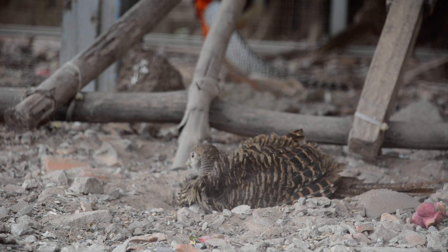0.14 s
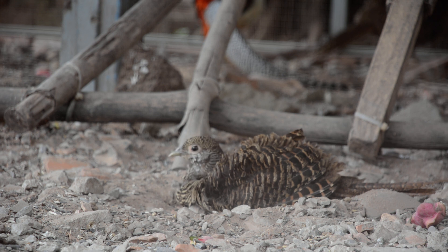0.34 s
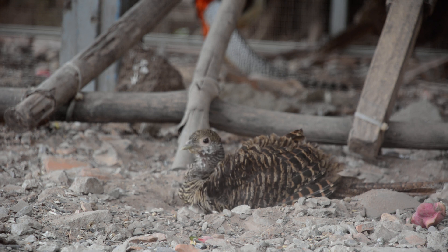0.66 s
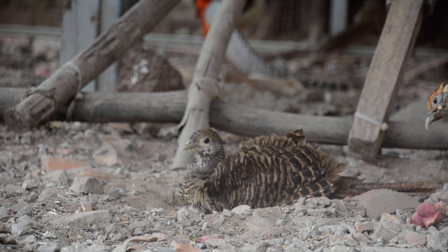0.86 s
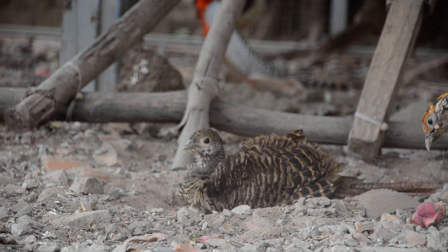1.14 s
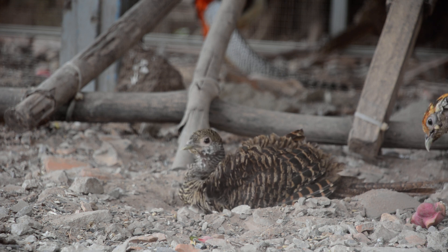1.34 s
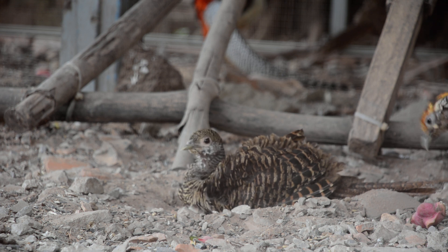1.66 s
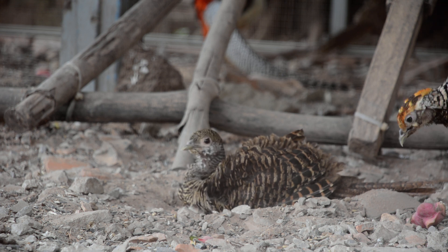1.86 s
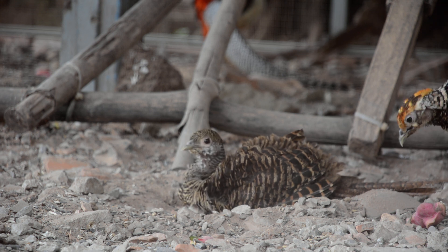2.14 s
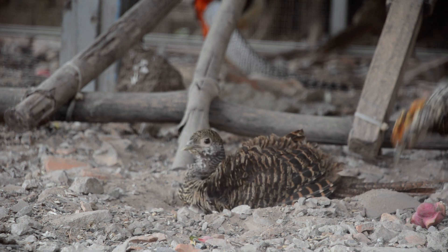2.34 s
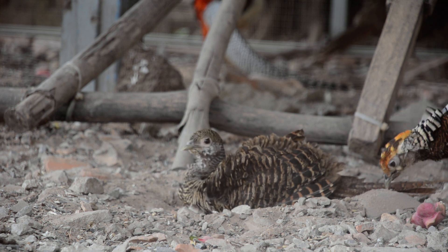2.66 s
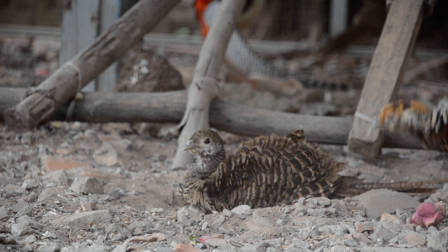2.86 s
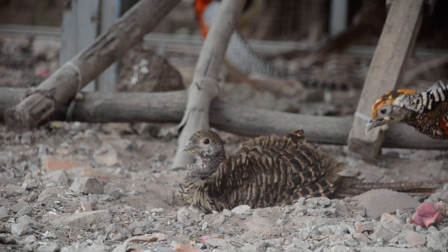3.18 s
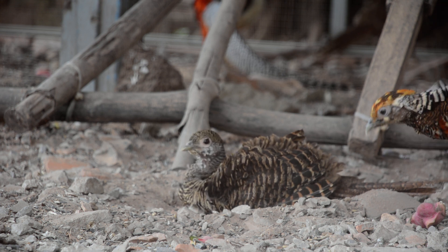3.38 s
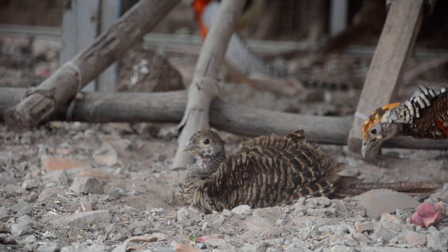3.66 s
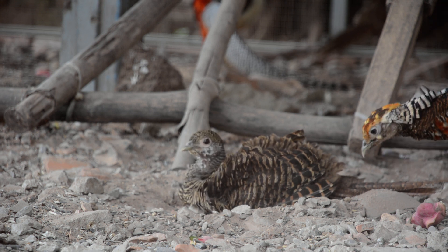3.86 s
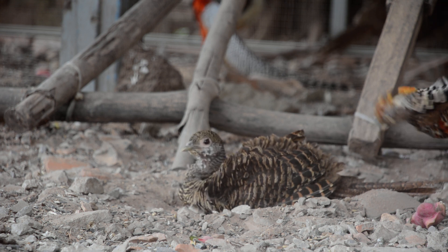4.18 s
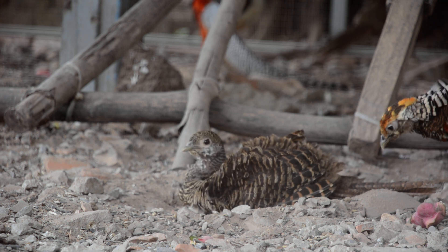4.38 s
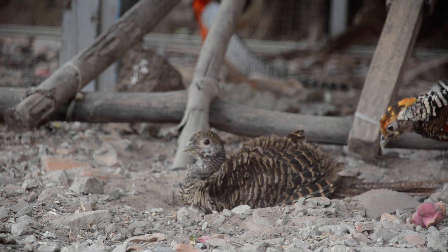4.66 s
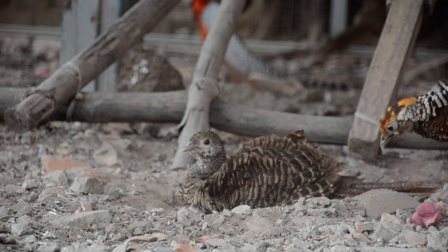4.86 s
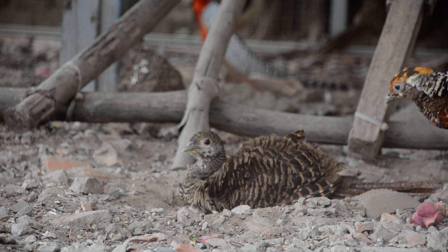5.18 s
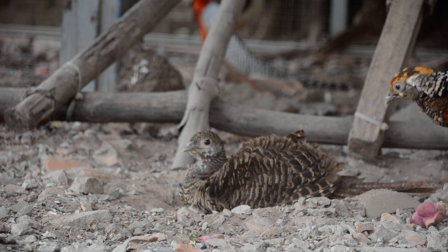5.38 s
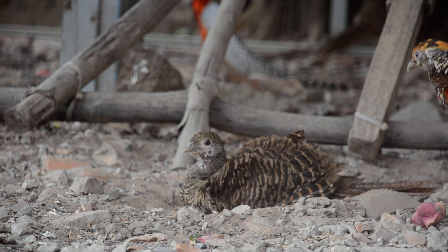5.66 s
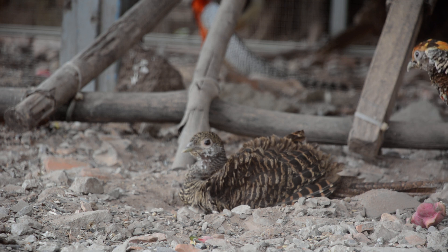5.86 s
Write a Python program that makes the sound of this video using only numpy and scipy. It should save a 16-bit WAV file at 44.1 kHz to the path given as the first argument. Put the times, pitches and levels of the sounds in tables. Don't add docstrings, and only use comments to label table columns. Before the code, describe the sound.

Birds call in a reverberant, hard-walled aviary, captured in stereo with a low traffic hum and faint motor drone. From 0.1 s a loud bird gives harsh, buzzy squawks, strongest and longest around 0.7-1.4 s; a shriller neighbour shrieks at 0.5 and sharply at 1.5 s, with a rough screech at 1.6. Thin peeps and a hoarse, raspy flock fill the gaps. Squawks resume at 1.9-2.4 s, then fade. Near 2.8 s comes a lull, then a quick arched chirp at 3.0. A bright, loud screech cuts through at 3.6-4.0 s. A croak at 4.4 leads to a strong clear pipe at 4.6, a throbbing whistle at 4.9, and a wavering, interrupted whistle from 5.2 to the end with short pips. Gravel clicks at 4.2 and most sharply at 5.6; distant clucks and coos are barely audible early.

```python
import sys
import numpy as np
from scipy import signal
from scipy.fft import rfft, irfft, next_fast_len
from scipy.io import wavfile
from scipy.ndimage import map_coordinates

SR = 44100
rng = np.random.default_rng(int(sys.argv[2]) if len(sys.argv) > 2 else 0)


def store_wav(level_fs):
    pcm = np.round(np.clip(np.atleast_2d(level_fs), -1, 1) * 32767)
    wavfile.write(sys.argv[1], SR, pcm.T.astype(np.int16))


def boost(x):
    u = np.asarray(x, float) / 20
    return 10 ** u


N = 265482
TIME_S = np.arange(N) / SR
ROLL_HZ, ROLL_DB = 75, 7


def rms_one(x):
    return x / np.sqrt(np.mean(x ** 2) + 1e-20)


def at_hz(points, hz):
    where, value = np.transpose(points)
    return np.interp(np.log(np.maximum(hz, 1)), np.log(where), value)


def shaped(x, gain_at):
    size = next_fast_len(len(x))
    hz = np.arange(size // 2 + 1) * SR / size
    return irfft(rfft(x, size) * gain_at(hz), size)[:len(x)]


def band(x, low_hz, high_hz):
    return signal.sosfilt(signal.butter(2, [low_hz, high_hz], "band", fs=SR, output="sos"), x)


def drift(rate_hz):
    r = np.exp(-2 * np.pi * rate_hz / SR)
    noise = rng.standard_normal(N + 4000)
    return rms_one(signal.lfilter([1], [1, -2 * r, r * r], noise)[4000:])


def tremor(rate_hz):
    low_pass = signal.butter(5, rate_hz, fs=SR, output="sos")
    return rms_one(signal.sosfilt(low_pass, rng.standard_normal(SR + 4000))[4000:])


def bumps(rows, x, power=2):
    return sum(db * np.exp(-((x - centre) / half) ** power) for centre, half, db in rows)


def swells(peak_s, swell_s, db):
    t = np.arange(0, N + 64, 64) / SR
    age = (t - peak_s[:, None]) / swell_s[:, None]
    each = boost(db[:, None] - 10 * np.where(age < 0, -age, age / 1.06) ** 1.4)
    return np.interp(TIME_S, t, np.sqrt(np.sum(each ** 2, axis=0)))


def phrase(row, shape):
    start, length, open_hz, settled_hz, db = row
    attack, rise_db, sag_db, release, fade_db, gliding = shape
    age = np.linspace(0, length, num=24)
    swell = rise_db * np.clip(1 - age / attack, 0, 1)
    sag = sag_db * np.maximum(age - attack, 0)
    fade = fade_db * np.clip(1 - (length - age) / release, 0, 1)
    pitch_hz = np.interp(age, [0, gliding * length], [open_hz, settled_hz])
    return np.transpose([start + age, pitch_hz, db - swell - sag - fade])


def call(rows, voice, rough):
    s, pitch_hz, level_db = np.transpose(rows)
    first, last = round(s[0] * SR), min(round(s[-1] * SR), N)
    t = np.arange(first, last) / SR
    wander = 1 + rough * (.012 * tremor(50) + .042 * tremor(200))[:len(t)]
    phase = 2 * np.pi * np.cumsum(np.interp(t, s, pitch_hz) * wander) / SR
    top_db = max(db for k, db in voice)
    tone = sum(boost(db - top_db) * np.sin(k * phase + k * k) for k, db in voice)
    flutter = boost(4.5 * min(rough, .6) * tremor(130)[:len(t)])
    edges = np.clip(np.minimum(t - t[0], t[-1] - t) / .01, 0, 1)
    out = np.zeros(N)
    out[first:last] = np.sqrt(2) * tone * flutter * edges * boost(np.interp(t, s, level_db))
    return out


def bird(calls, shape, voices, roughs, trim_db):
    roughs = np.resize(roughs, len(calls))
    return boost(trim_db) * sum(call(phrase(c, shape), v, r) for c, v, r in zip(calls, voices, roughs))


# start in seconds, length in seconds, opening pitch in Hz,
# settled pitch in Hz, level in dB of the strongest partial. Other birds' calls use the same columns.
SQUAWK_CALLS = [
    (0, 0.11, 2110, 2027, -48.5),
    (0.131, 0.16, 2152, 2023, -37),
    (0.247, 0.135, 1960, 1956, -33),
    (0.72, 0.25, 2166, 2120, -31.5),
    (0.901, 0.14, 2085, 2041, -29.5),
    (1.028, 0.36, 2026, 2027, -29),
    (1.854, .23, 2086, 2000, -36),
    (2.084, 0.18, 2122, 2062, -33),
    (2.269, 0.17, 2004, 1904, -39.5),
]
SQUAWK_ROUGHNESS = [.4, .45, .35, .55, .58, .56, .55, .55, .5]
# multiple of the pitch, level in dB. All voices use these columns.
SQUAWK_PARTIALS = [(1, -4.5), (2, 1.5), (3, -15.5), (3.5, -20.5), (4, -11.5), (5, -28), (6, -41), (7, -51)]
# attack in seconds, rise in dB, sag in dB per second, release in seconds, fade in dB,
# share of the call spent gliding. All shapes use this order.
SQUAWK_CONTOUR = (0.077, 1.8, 24, 0.072, 4.6, .6)


def squawker():
    voices = [SQUAWK_PARTIALS] * len(SQUAWK_CALLS)
    return bird(SQUAWK_CALLS, SQUAWK_CONTOUR, voices, SQUAWK_ROUGHNESS, trim_db=5.0)


SHRIEK_CALLS = [
    (.53, 0.22, 2024, 2040, -34),
    (1.5, 0.149, 2066, 2089, -30),
    (2.39, 0.177, 1975, 2038, -36),
    (2.94, 0.22, 2200, 1983, -42),
]
# multiple of the pitch, level in dB.
SHRIEK_PARTIALS = [(1, -5), (2, 2), (3, -9), (3.5, -15), (4, -7), (5, -19), (6, -37), (7, -51)]
SHRIEK_ROUGHNESS = [.6, .7, .6, .7]
SHRIEK_CONTOUR = (0.093, 4.5, 28, 0.11, 7, .5)
SHRIEK_ROLL = [.6, .3, .7, 1]


def shrieker():
    dying = sum(share * np.exp(-np.abs(TIME_S - c[0]) / .08) for c, share in zip(SHRIEK_CALLS, SHRIEK_ROLL))
    voices = [SHRIEK_PARTIALS] * len(SHRIEK_CALLS)
    voice = bird(SHRIEK_CALLS, SHRIEK_CONTOUR, voices, SHRIEK_ROUGHNESS, trim_db=2.0)
    roll = dying * np.sin(2 * np.pi * ROLL_HZ * TIME_S)
    pitch_bend = 0.035
    bent_s = TIME_S + roll * pitch_bend / (2 * np.pi * ROLL_HZ)
    return boost(ROLL_DB * roll) * map_coordinates(voice, [bent_s * SR], order=3)


SCREECH_CALLS = [
    (1.63, 0.3, 1102, 1097, -26.5),
    (3.565, 0.14, 1083, 1085, -31.5),
    (3.635, .35, 1141, 1100, -23.5),
]
# multiple of the pitch, level in dB.
SCREECH_PARTIALS = [
    [(2, -16), (4, 9.5), (5, 1.5), (6, -23), (8, -2), (10, -19)],
    [(2, -3), (4, -6), (5, 4), (10, -8.5)],
    [(1, -15), (2, -21), (3, -4), (4, 11.5), (6, -19), (8, 2.5)],
]
SCREECH_ROUGHNESS = [.85, .7, .32]
SCREECH_CONTOUR = (0.094, 5.4, 85, 0.12, 10, .7)


def screecher():
    return bird(SCREECH_CALLS, SCREECH_CONTOUR, SCREECH_PARTIALS, SCREECH_ROUGHNESS, trim_db=-5.0)


CROAK_CALLS = [
    (3.32, 0.2, 1425, 1500, -47),
    (4.06, 0.12, 1491, 1543, -43.5),
    (4.23, 0.077, 1780, 1730, -42),
    (4.42, 0.145, 1918, 1832, -29.5),
    (5.11, 0.14, 1807, 1880, -47.5),
]
# multiple of the pitch, level in dB.
CROAK_PARTIALS = [
    [(1, -20), (2, -7.5), (2.8, -7.5)],
    [(1, -1), (2, 11), (3, -4)],
    [(1.33, 8), (2, -3), (3.33, -10)],
    [(1, -8), (1.5, -11), (2, 6), (3.5, -17), (4, -8), (4.5, -11), (5, -15)],
    [(2, 0.5), (4, -2)],
]
CROAK_ROUGHNESS = [1.2, 1.2, .2, .7, 1.0]
CROAK_CONTOUR = (0.058, 2.6, 20, 0.065, 20, 0.614)


def croaker():
    return bird(CROAK_CALLS, CROAK_CONTOUR, CROAK_PARTIALS, CROAK_ROUGHNESS, trim_db=2.0)


PIPING_CALLS = [
    (4.61, 0.21, 1577, 1529, -27.5),
    (4.91, 0.16, 1576, 1582, -39.5),
    (5.37, 0.088, 1584, 1550, -40),
    (5.48, 0.078, 1562, 1525, -39.5),
    (5.675, 0.12, 1576, 1582, -40),
    (5.83, 0.13, 1583, 1550, -37.5),
    (5.96, 0.066, 1574, 1563, -42),
]
# multiple of the pitch, level in dB.
PIPING_PARTIALS = [
    [(2, 3), (3, -19), (4, -15.5)],
    [(1, -13), (2, 1), (3, 0.5), (5, -12)],
    [(2, 3.5), (3, -10)],
    [(2, -3), (3, -7)],
    [(2, 1), (3, -1.5), (5, -19)],
    [(2, 2), (3, -2), (5, -8)],
    [(2, 0), (3, -5)],
]
PIPING_CONTOUR = (0.011, 1.5, 95, 0.043, 13, 0.412)


def piping():
    return bird(PIPING_CALLS, PIPING_CONTOUR, PIPING_PARTIALS, .16, trim_db=-4.5)


TRILL_CALLS = [
    (4.855, 0.221, 2800, 2749, -37.5),
]
# multiple of the pitch, level in dB.
TRILL_PARTIALS = [
    [(1, 15), (2, -8.5), (3, -36)],
]
TRILL_CONTOUR = (0.044, 7.5, 12, 0.14, 7.2, 0.676)
# centre in seconds, half length in seconds, gain in dB.
TRILL_THROBS = [(4.885, 0.013, 2), (4.902, .004, -8), (4.914, .004, 11), (4.92, 0.0023, -19),
                (4.929, .007, 10.5), (4.949, .006, -6.5), (4.962, 0.0046, 6), (4.973, 0.0059, -15),
                (4.997, .012, 6.5), (5.022, .006, 0), (5.04, 0.012, 8)]


def trilled_whistle():
    return boost(bumps(TRILL_THROBS, TIME_S)) * bird(TRILL_CALLS, TRILL_CONTOUR, TRILL_PARTIALS, .1, trim_db=2.0)


# time in seconds, pitch in Hz, level in dB.
LONG_PATH = [(5.15, 1205, -39.5), (5.2, 1258, -50), (5.225, 1394, -44), (5.33, 1423, -34.5),
             (5.42, 1451, -33), (5.49, 1451, -33), (5.62, 1463, -37), (5.87, 1462, -35.5),
             (6.02, 1435, -43)]
# multiple of the pitch, level in dB.
LONG_PARTIALS = [(1, -2), (2, -19.5)]
# centre in seconds, half length in seconds, depth in dB.
BREATH_CATCHES = [(5.262, .01, 6), (5.358, .012, 18), (5.39, .022, 8), (5.462, .007, 5), (5.533, .016, 12),
                  (5.575, .025, 4), (5.604, .008, 18), (5.621, .009, -3), (5.69, .015, 5), (5.785, .01, 10),
                  (5.848, .011, 14), (5.888, .009, 13), (5.94, .015, 8), (5.985, .015, 8)]


def long_whistle():
    beads = boost(drift(45))
    catches = boost(-bumps(BREATH_CATCHES, TIME_S, power=4))
    return beads * catches * call(LONG_PATH, LONG_PARTIALS, rough=.34)


# time in seconds, pitch in Hz, level in dB.
CHIRP_PATH = [
    (2.87, 1670, -69),
    (2.94, 1920, -51.5),
    (2.98, 2080, -54),
    (3.008, 2020, -37),
    (3.03, 1800, -43),
]
# multiple of the pitch, level in dB.
CHIRP_PARTIALS = [(1, -6), (2, 3.5), (3, 1), (4, 5), (5, -2)]


def chirp():
    rising = TIME_S < CHIRP_PATH[2][0]
    roll = boost(ROLL_DB * np.sin(2 * np.pi * ROLL_HZ * TIME_S) * rising)
    return roll * call(CHIRP_PATH, CHIRP_PARTIALS, rough=0.32)


PEEP_CALLS = [
    (.31, .09, 2890, 2860, -45),
    (.63, .09, 3043, 3020, -47),
    (1.05, .33, 3030, 3040, -43),
    (1.62, .18, 3050, 3180, -48),
    (1.87, .13, 3150, 3000, -47),
    (2.16, .14, 3140, 3090, -42),
]
PEEP_ROUGHNESS = [.25, .4, .6, .55, .7, .45]
PEEP_CONTOUR = (0.014, 2.1, 42, 0.028, 21, 0.583)


def peeps():
    return bird(PEEP_CALLS, PEEP_CONTOUR, [[(1, 0)]] * len(PEEP_CALLS), PEEP_ROUGHNESS, trim_db=4.5)


# start in
# seconds, end in seconds, pitch in Hz, level in dB, roughness 0 upward.
LONE_NOTES = [(.76, .94, 2160, -32.5, 0.39), (1.53, 1.69, 2080, -33, 0.36), (3.63, 3.93, 3330, -40.5, 0.22),
              (3.82, 3.95, 2700, -46, 0.28), (0.85, 0.94, 5220, -46, 0.24), (1.441, 1.507, 3100, -38, 0.23),
              (1.532, 1.699, 2350, -36, 0.59), (1.365, 1.464, 1361, -49.5, 0.34),
              (3.609, 3.695, 4215, -30.5, 0.25), (3.74, 3.92, 7040, -47, 0.18),
              (3.73, 3.92, 1130, -51.5, 0.37), (4.25, 4.32, 4700, -60, .1),
              (4.289, 4.424, 2894, -42.5, 0.98), (4.504, 4.675, 2777, -40.5, 0.7),
              (4.457, 4.56, 5800, -48, 0.55), (5.221, 5.32, 4800, -54, 0.6), (5.3, 5.36, 2500, -41, 0.72),
              (5.502, 5.55, 2700, -45, 0.64), (5.848, 5.964, 2200, -51, 0.85), (5.9, 5.97, 1220, -44, 0.64),
              (.17, 0.272, 2090, -35, 0.32), (0.33, 0.36, 1950, -36, 0), (0.25, 0.43, 5800, -46, .3),
               (0.092, 0.27, 4300, -41.5, 0.9), (0.79, 1.02, 3650, -39, .8), (1.08, 1.32, 3300, -44, .8),
               (.72, 0.77, 3020, -53, 0.4), (1.465, 1.52, 7500, -38.5, 0.96), (4.83, 4.9, 11450, -63.5, .3),
               (4.9, 5.0, 9450, -61, 0.14), (5.1, 5.22, 3650, -43, .35), (2.96, 3.03, 4350, -40, .5),
               (3.02, 3.1, 3900, -43, .5), (4.81, 4.92, 2330, -41, 0.28), (4.9, 5.04, 2300, -47.5, .35),
               (1.474, 1.488, 3400, -23, 0.62), (1.468, 1.492, 2300, -34.5, 0.71),
               (1.64, 1.8, 5500, -39, .45), (2.41, 2.57, 5950, -42.5, 0.5), (2.89, 2.97, 2750, -50, 0.62),
               (2.9, 2.97, 4200, -58, 0.88), (3.6, 3.76, 5400, -43, 0), (3.62, 3.7, 2170, -44, 0.41),
               (3.79, 3.95, 3400, -50, 0.3), (3.76, 3.87, 7200, -41.5, .55), (4.475, 4.57, 1860, -39, 0.26),
               (4.56, 4.67, 5700, -51, 0.44), (5.57, 5.68, 3100, -54.5, 0.24),
               (5.75, 5.83, 3150, -51, 0.16), (4.92, 5.08, 3150, -48, 0.16), (5.88, 5.94, 4100, -51, 0.7),
               (3.66, 3.85, 4200, -32, 0.16), (3.74, 3.98, 4440, -39.5, .2), (5.5, 5.95, 1560, -46.5, .22),
               (5.22, 5.45, 1400, -52, 0.29), (5.1, 5.18, 2770, -46, 0.16), (.54, 0.73, 6100, -43, 0.2),
               (2.81, 2.84, 930, -46.5, 1.05)]


def lone_notes():
    out = 0
    for a, b, hz, db, rough in LONE_NOTES:
        path = [(a, hz, db - 4), ((2 * a + b) / 3, hz, db), (b, hz, db - 5)]
        out = out + call(path, [(1, 0)], 4 * rough ** 1.5)
    return out


# peak in seconds, swell time in seconds for 10 dB, level in dB, brightness in dB.
OUTBURSTS = [(.08, 0.5, -41, -32), (.17, 0.3, -36, -5), (.5, -1.5, -42.5, -5), (.75, 0.52, -46, 12),
             (.94, 0.04, -36, -8), (1.15, 0.2, -28, -2.5), (1.44, 0.11, -31, -8.5), (1.47, 0, -33, 12),
             (1.63, 0.07, -32.5, 7), (1.89, 0.39, -33.5, 1), (2.31, 0.3, -35.5, -1),
             (2.49, -0.01, -35.5, -8), (2.961, 0.14, -39, -3), (3.04, 0.08, -41, 4), (3.44, 0, -47, 2),
             (3.57, 0.2, -39.5, -5), (3.64, 0.07, -40, 4.5), (3.72, 0.0824, -29.5, 3),
             (3.8, 0.1346, -28.5, -5.5), (4.12, 0.1, -37.5, -24), (4.31, -0.1, -39, -18),
             (4.39, 0.07, -36.5, 0.5), (4.46, 0, -32.5, 4), (4.56, -0.15, -33.5, -0.5),
             (4.71, -0.3, -36.5, -14), (4.95, -4, -49.5, -24), (5.18, 0.11, -29.5, -9),
             (5.5, 0.3, -39, -15), (5.868, 0.08, -30, -7), (6.01, 1.2, -47, -23)]
# frequency in Hz, level in dB per Hz.
RASP_COLOUR = [(530, -50), (900, -8), (1270, -7), (1430, -13.5), (1670, -14), (2070, -3.5), (2600, -7.5),
               (4090, 5), (4950, -6), (6140, -11), (9210, -6.5), (15600, -55)]


def chorus():
    s, swell_s, db, bright_db = np.transpose(OUTBURSTS)
    effort = 0
    for c in SQUAWK_CALLS + SHRIEK_CALLS:
        path = phrase(c, SQUAWK_CONTOUR)
        effort = effort + boost(np.interp(TIME_S, path[:, 0], path[:, 2], left=-120, right=-120))
    throat = swells(s, swell_s, db)
    beak = np.hypot(swells(s, swell_s, db + bright_db), boost(-27) * effort)
    hiss = np.hypot(swells(s, swell_s, db - 9.5 + 0.9 * bright_db), boost(-10) * effort)
    out = 0
    for gain, low_hz, high_hz in ((throat, 1500, 3350), (beak, 4200, 7630), (hiss, 6600, 12600)):
        slaps = rng.standard_normal(N) * boost(2.5 * drift(120))
        rasp = band(shaped(slaps, lambda hz: boost(at_hz(RASP_COLOUR, hz))), low_hz, high_hz)
        out = out + rms_one(rasp) * gain * boost(-4.5)
    return out


# centre in Hz, width in Hz, depth in dB.
SQUAWK_GAPS = [(1600, 170, -5), (2560, 260, -13), (3500, 170, -9), (5000, 330, -8), (7050, 300, -6),
               (9000, 350, -4)]
# time in seconds, share of the rasp that has those gaps, 0 to 1.
GAP_CLEARNESS = [(0, .5), (.15, .4), (.22, .95), (.42, .9), (.5, .6), (.6, .85), (.87, .97), (.97, .5),
                 (1.15, .3), (1.35, .8), (1.5, .4), (1.7, .4), (1.92, .9), (2.05, .5), (2.2, .8),
                 (2.65, .85), (2.85, .05), (6.02, 0)]
# centre in Hz, width in Hz, depth in dB.
LAST_SCREECH_GAPS = [(1700, 300, -5), (2850, 200, -7), (3850, 230, -11), (4950, 150, -7)]


def gapped(x):
    squawk_share = np.interp(TIME_S, *np.transpose(GAP_CLEARNESS))
    screech_share = np.minimum(TIME_S - 3.62, 4.0 - TIME_S) / .04
    out = x
    for share, gaps in ((squawk_share, SQUAWK_GAPS), (screech_share, LAST_SCREECH_GAPS)):
        cut = shaped(x, lambda hz: boost(bumps(gaps, hz)))
        out = out + np.clip(share, 0, 1) * (cut - x)
    return out


# time in seconds, peak level in dB.
GRAVEL = [(0.1301, -55), (1.479, -43), (2.799, -48), (2.815, -45), (3.245, -42), (4.071, -45), (4.19, -36),
          (5.096, -41), (5.27, -39), (5.3053, -48), (5.4071, -46), (5.6148, -30.5), (6.003, -49.5)]


def gravel_ticks():
    out, t = np.zeros(N + 4000), np.arange(4000) / SR
    scatter = .2 * np.clip(t / .006, .3, 1) * np.exp(-t / .022)
    for s, db in GRAVEL:
        at = round(s * SR)
        crack = 3.7 * (t == 0)
        out[at:at + 4000] += boost(db + 3) * (crack + rng.standard_normal(4000) * scatter)
    return band(out[:N], 5600, 11000)


# time in seconds, peak level in dB, pitch in Hz.
HEN_CLUCKS = [
    (0.119, -68, 1120),
    (0.469, -68.5, 851),
    (1.419, -68, 1330),
    (1.879, -70, 1210),
    (2.579, -68.5, 651),
    (2.815, -68.5, 1200),
]


def clucks():
    out = 0
    for s, db, hz in HEN_CLUCKS:
        swell = np.exp(-((TIME_S - s - .02) / 0.018) ** 2)
        tone = np.sin(2 * np.pi * hz * TIME_S) + 0.16 * np.sin(3 * np.pi * hz * TIME_S)
        out = out + boost(db + 22.0) * swell * tone
    return out


# peak in seconds, swell time in seconds for 10 dB, level in dB.
DOVES = [(.08, 0.37, -48), (.85, 0.4, -56), (1.05, 0.3, -55), (1.8, 0.4, -51.5), (2.6, 1.05, -55),
         (2.83, 0.4, -52.5), (3.4, 0.6, -66)]


def cooing():
    return rms_one(band(rng.standard_normal(N), 339, 610)) * swells(*np.transpose(DOVES)) * boost(-4.5)


# frequency in Hz, level in dB.
MOTOR_TONES = [(80, -67), (285, -70)]


def motor():
    return sum(boost(db + 0.95 * drift(6.3)) * np.sin(2 * np.pi * hz * TIME_S) for hz, db in MOTOR_TONES)


# frequency in Hz, level in dB per Hz.
HUM_COLOUR = [(25, -38), (45, -16), (86, -6.5), (156, -3.5), (230, -9), (700, -7), (1460, -5), (2490, -6),
              (3540, -5.5), (5160, -10), (9580, -21), (11900, -30), (14000, -38), (15600, -41)]
# time in seconds, gain in dB.
HUM_LEVEL = [(0, 1), (3, -1.75), (6.02, -2)]
# centre in seconds, width in seconds, gain in dB.
FLOCK_LULLS = [(.08, 0.022, -13), (2.83, 0.077, -19), (3.27, 0.04, -5), (3.52, 0.022, -7),
               (4.03, 0.065, 0.5), (4.8, 0.047, -9), (5.45, 0.021, -5)]


def hum():
    fade = boost(-46 + np.interp(TIME_S, *np.transpose(HUM_LEVEL)))
    lull = boost(bumps(FLOCK_LULLS, TIME_S))
    takes = []
    for noise in rng.standard_normal((2, N)):
        air = rms_one(shaped(noise, lambda hz: boost(at_hz(HUM_COLOUR, hz))))
        flock = shaped(air, lambda hz: hz ** 4 / (hz ** 4 + 2800 ** 4))
        takes.append(fade * (air + (lull - 1) * flock))
    return takes


# frequency in Hz, seconds to fall 60 dB.
TAIL_T60 = [(500, 0.81), (4000, 0.49), (12000, 0.26)]


def aviary(x):
    t, edges = np.arange(SR) / SR, 250 * 2.0 ** np.arange(7)
    rise = np.clip((t - .003) / .006, 0, 1)
    out = []
    for noise in rng.standard_normal((2, SR)):
        echoes = 0
        for low_hz, high_hz in zip(edges, edges[1:]):
            early = boost(-60 * t / 0.1)
            tail = boost(-6.5 - 60 * t / at_hz(TAIL_T60, low_hz * np.sqrt(2)))
            echoes = echoes + band(noise, low_hz, high_hz) * (early + tail)
        echoes = rise * echoes
        out.append(signal.fftconvolve(x, echoes / np.sqrt(np.sum(echoes ** 2)))[:N])
    return out


# frequency in Hz, side over mid in dB.
SIDE_LEVEL = [(60, -27), (110, -29), (200, -13), (380, -9.5), (700, -7.5), (1290, -14), (2380, -15.5),
              (4400, -11.5), (8120, -5.5), (15000, 2)]
# frequency in Hz, share of the side that is a phase lead, 0 to 1.
LEAD_SHARE = [(100, .1), (2000, .2), (6000, .4), (14000, .5)]


def two_ports(mid, other):
    def share(hz):
        return np.clip(at_hz(LEAD_SHARE, hz), -.99, .99)
    lead = shaped(mid, lambda hz: 1j * share(hz) * boost(at_hz(SIDE_LEVEL, hz)))
    diffuse = shaped(other, lambda hz: np.sqrt(1 - share(hz) ** 2) * boost(at_hz(SIDE_LEVEL, hz)))
    return np.array([mid + lead + diffuse, mid - lead - diffuse])


def scene():
    shrill, piper = shrieker(), piping()
    birds = squawker() + shrill + screecher() + croaker() + piper + peeps() + lone_notes()
    birds = birds + boost(-1.0) * gapped(chorus())
    near = trilled_whistle() + long_whistle() + chirp()
    wet, wet_other = aviary(birds + boost(-10) * near)
    air, air_other = hum()
    direct = boost(-9) * birds + boost(-7) * shrill + boost(-5) * piper + near
    mid = direct + wet + gapped(air) + gravel_ticks() + clucks() + cooing() + motor()
    return two_ports(mid, boost(1.5) * wet_other + air_other)


def top_cut(x):
    return signal.sosfilt(signal.butter(12, 15710, fs=SR, output="sos"), x)


def record(dry):
    return top_cut(dry)


dry = scene()
out = record(dry)
store_wav(out)
```